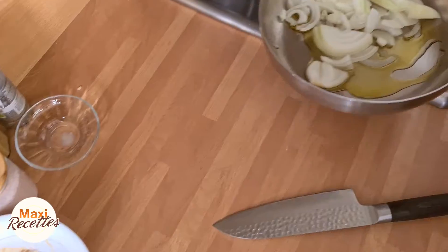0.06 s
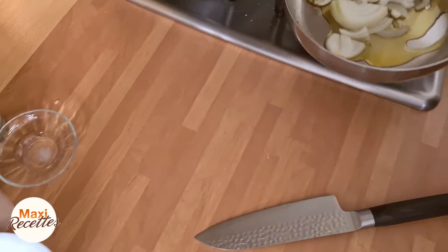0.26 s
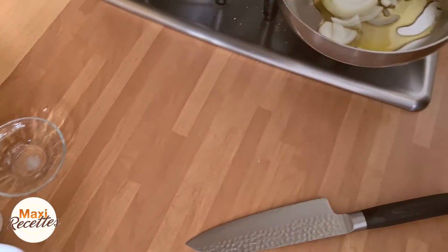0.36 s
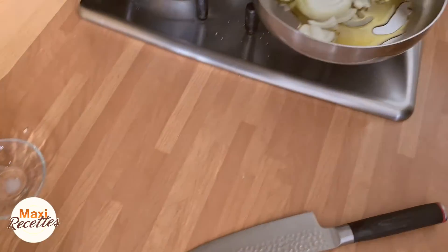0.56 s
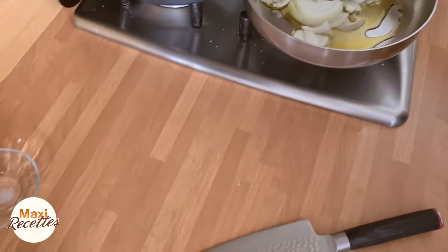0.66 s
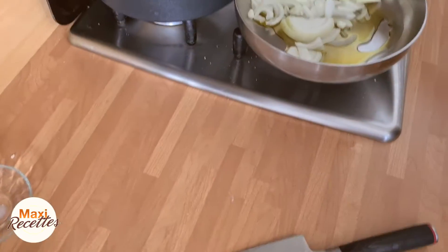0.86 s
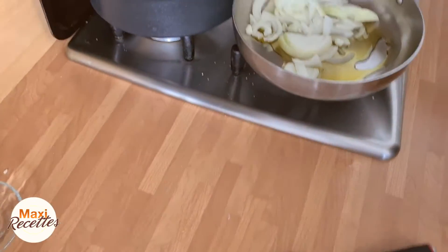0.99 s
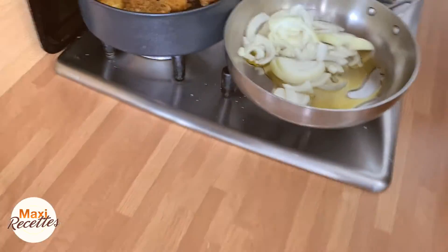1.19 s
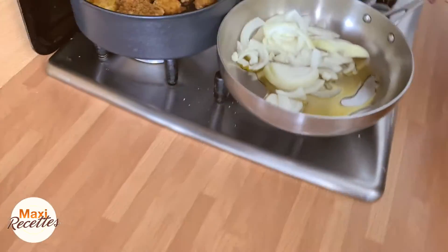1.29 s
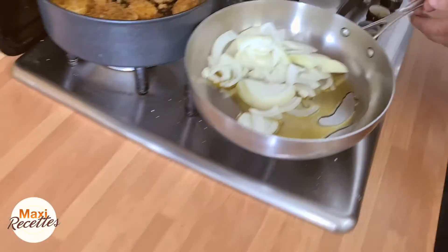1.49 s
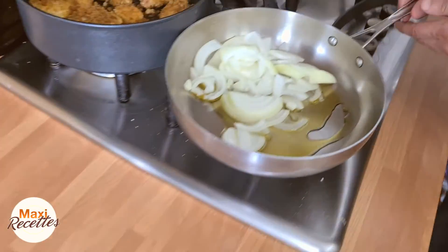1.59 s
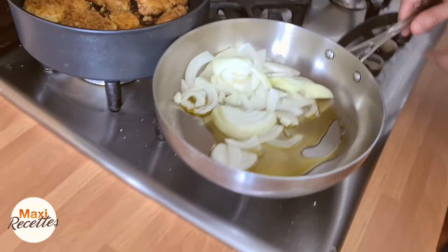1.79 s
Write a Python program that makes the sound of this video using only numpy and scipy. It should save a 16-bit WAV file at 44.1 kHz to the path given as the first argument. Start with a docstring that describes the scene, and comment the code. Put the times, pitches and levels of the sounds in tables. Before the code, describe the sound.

A steel frying pan clanks onto a stove grate and is nudged, over faint sizzling.

```python
"""Small kitchen, gas hob. A steel frying pan of onions lands on the grate with a clank, rocks, is slid
and nudged into place. Each contact thuds and rings the modes of pan and hob; bare steel clinks on iron;
friction scrapes and briefly squeals. The sheet-metal hob and the worktop boom under the weight.
A pot on the next burner sizzles and spits quietly over a low room drone."""
import sys
import numpy as np
from scipy import signal
from scipy.fft import rfft, irfft, next_fast_len
from scipy.io import wavfile
from scipy.ndimage import map_coordinates

SR = 44100
rng = np.random.default_rng(int(sys.argv[2]) if len(sys.argv) > 2 else 0)


def master(y):
    """Save y as 16-bit WAV."""
    cut = np.clip(np.atleast_2d(y).T, -1, 1)
    pcm = np.round(cut * 32767)  # scale
    wavfile.write(sys.argv[1], SR, pcm.astype(np.int16))


N = 81585

# left-right likeness of hot-oil noise: freq_hz, correlation
OIL_LIKENESS = [(200, 1), (1000, 0.44), (4000, 0.1), (12000, 0.037)]
# left-right likeness of contact and room noise: freq_hz, correlation
BODY_LIKENESS = [(120, 0.93), (330, 0.78), (1200, 0.7), (4000, 0.2)]
ATTACK_S = 0.00083


def amp(db):
    """Decibels to gain."""
    return 10 ** (np.asarray(db) / 20)


def unit(x):
    """Scale to rms 1."""
    return x / np.sqrt(np.mean(x ** 2) + 1e-20)


def along(points, hz):
    """Interpolate (freq_hz, value) points on a log axis."""
    freq_hz, values = np.transpose(points)
    return np.interp(np.log(hz + 1), np.log(freq_hz + 1), values)


def clock():
    """Sample times in seconds."""
    return np.arange(N) / SR


def wobble(knots_per_s):
    """Smooth random curve."""
    return map_coordinates(rng.standard_normal(int(N * knots_per_s / SR) + 4), [clock() * knots_per_s])


def filtered(x, response):
    """Apply a frequency response."""
    n = x.shape[-1]
    padded = next_fast_len(n + 8192)
    return irfft(rfft(x, padded) * response(np.fft.rfftfreq(padded, 1 / SR)), padded)[..., :n]


def noise(colour, likeness, size):
    """Stereo noise, rms 1, of given colour and left-right likeness."""
    def response(hz):
        angle = np.arccos(np.clip(along(likeness, hz), -1, 1)) / 2
        return colour(hz) * np.array([np.cos(angle), np.sin(angle)])
    mid, side = filtered(rng.standard_normal((2, size)), response)
    return unit(np.array([mid + side, mid - side]))


def fade(t, t60_s):
    """Exponential decay, 60 dB in t60_s."""
    return np.exp(-np.log(1000) * t / t60_s)


def resonance(hz, centre_hz, width_hz):
    """Second-order band-pass response."""
    return 1j * hz * width_hz / (centre_hz ** 2 - hz ** 2 + 1j * hz * width_hz)


def ring(modes, t, drive, scatter_db=4.5, waver_rad=0.3, waver_per_s=45):
    """Damped modes start from rest and waver as the contact shifts."""
    out = np.zeros_like(t)
    for k, (hz, level_db, t60_s) in enumerate(modes):
        gain = (-1) ** k * drive(hz) * amp(level_db + scatter_db * rng.standard_normal())
        waver = waver_rad * map_coordinates(rng.standard_normal(100), [t * waver_per_s], mode="mirror")
        out += gain * fade(t, t60_s) * np.sin(2 * np.pi * hz * t + waver)
    return out * (1 - np.exp(-t / ATTACK_S))


def add(out, start_s, x):
    """Mix x into out from start_s."""
    part = out[:, round(start_s * SR):][:, :x.shape[-1]]
    part += x[..., :part.shape[1]]


def pot_sizzle(flutter_db=0.77, pops_per_s=70, spread_db=3.5, fizz_db=-7.5, bright_hz=4940):
    """The pot hisses steadily, with a fizz of tiny, brighter bursts on top."""
    # hiss spectrum: freq_hz, gain_db
    spectrum = [(120, -42), (200, -12), (300, -15), (470, -3), (970, -5), (1500, -1.5), (2200, -4.5),
                (3400, -1.5), (4600, -5), (6200, -6.5), (7600, -11.5), (15000, -11), (16000, -18.5)]
    # hiss contour: time_s, level_db
    contour = [(0, -48), (.55, -47.5), (.85, -47.5), (1.1, -47), (1.6, -45), (1.85, -48)]
    colour = lambda hz: amp(along(spectrum, hz))
    brighter = lambda hz: colour(hz) * hz / np.hypot(hz, bright_hz)
    pops = (rng.random(N) < pops_per_s / SR) * amp(spread_db * rng.standard_normal(N))
    bursts = signal.fftconvolve(pops, fade(clock()[:SR // 20], t60_s=0.02))[:N]
    fizz = unit(bursts * noise(brighter, OIL_LIKENESS, N))
    level_db = np.interp(clock(), *np.transpose(contour)) + flutter_db * wobble(30.67)
    return amp(level_db) * (noise(colour, OIL_LIKENESS, N) + amp(fizz_db) * fizz)


def kitchen_drone(level_db=-54):
    """Low, steady room noise."""
    # drone spectrum: freq_hz, gain_db
    spectrum = [(20, -28), (42, -6), (61, 4.5), (78, -6), (100, -13.5), (130, -6.5), (175, -16.5),
                (400, -16.5), (900, -38)]
    return amp(level_db) * noise(lambda hz: amp(along(spectrum, hz)), BODY_LIKENESS, N)


def oil_spits(rise_s=0.00082, q=2.9):
    """Single drops burst in hot oil, each a short band of noise."""
    # drops: start_s, level_db, centre_hz, t60_s
    drops = [(.105, -44, 4100, .04), (0.353, -42.5, 10400, 0.033), (.452, -40.5, 6430, .03),
             (0.648, -35.5, 8600, 0.02), (0.728, -37, 4080, 0.024), (0.806, -30.5, 10800, 0.014),
             (0.8358, -38.5, 4000, 0.044), (.887, -37, 6500, .05), (0.915, -32, 4690, 0.019),
             (1.065, -41.5, 5370, .05), (1.151, -42, 5600, .05), (1.2301, -33.5, 2950, 0.014),
             (1.2304, -35, 10900, 0.015), (1.278, -32.5, 5220, 0.033), (1.346, -41, 13000, 0.063),
             (1.393, -42, 9450, 0.069), (1.417, -36.5, 4300, 0.032), (1.436, -38.5, 3820, 0.035),
             (1.507, -38, 2980, 0.073)]
    out, t = np.zeros((2, N)), clock()[:SR // 8]
    for start_s, level_db, centre_hz, t60_s in drops:
        band = noise(lambda hz: resonance(hz, centre_hz, centre_hz / q) ** 2, OIL_LIKENESS, len(t))
        add(out, start_s, amp(level_db) * (1 - np.exp(-t / rise_s)) * fade(t, t60_s) * band)
    return out


def pan_slides(upper_ratio=1.654, wander=0.0096, rise_s=0.0074, fall_s=0.028):
    """Friction excites two pan resonances and at times locks into a squeal on the lower one."""
    # pan base on grate: start_s, length_s, level_db, main_hz, width_hz, upper_db, squeal_db
    strokes = [(.183, 0.044, -38, 660, 150, -3, -20), (.42, 0.091, -38.5, 807, 66.5, 3, -9),
               (.505, 0.083, -47, 576.7, 60, -8, -3.5), (1.149, 0.047, -43.5, 1450, 600, -8, -31),
               (1.478, 0.022, -44, 825.6, 70, -1, 9), (1.66, 0.15, -62.5, 820.4, 60, -13, 8)]
    out, t = np.zeros((2, N)), clock()[:SR // 3]
    for start_s, length_s, level_db, main_hz, width_hz, upper_db, squeal_db in strokes:
        body = lambda hz: (resonance(hz, main_hz, width_hz)
                           - amp(upper_db) * resonance(hz, upper_ratio * main_hz, width_hz))
        envelope = (1 - np.exp(-t / rise_s)) * np.exp(-np.maximum(t - length_s / 2, 0) / fall_s)
        pitch_hz = main_hz * (1 + wander * wobble(69)[:len(t)])
        squeal = unit(np.sin(2 * np.pi * np.cumsum(pitch_hz) / SR))
        scrape = noise(body, BODY_LIKENESS, len(t))
        add(out, start_s, amp(level_db) * envelope * (scrape + amp(squeal_db) * squeal))
    return out


def pan_blows(pan_trim_db=-5.5, hob_trim_db=-2, thud_db=-3, push_db=3.5, thud_low_hz=124, order=4.35):
    """Contacts push, thud and ring pan and hob, each with its own brightness; a seated pan rings less."""
    # pan on grate: start_s, level_db, bright_hz, pan_db, hob_db, left_right_db, seat_damping (1 = free)
    contacts = [(.2012, -13, 1156, 4.5, -6, -4, 1.117), (0.2088, -17.5, 1320, -36, -20.5, 1.5, 1.5),
                (.223, -21, 1370, -3, 2.5, -3.5, 1.5), (0.2884, -23.5, 1280, -5, -8, 0.5, 0.92),
                (.305, -29, 905, -21, 2.5, -1.5, 1.8), (.323, -27, 850, 6.5, -11, -2.5, 1.22),
                (0.612, -24, 1064, -7, -5, -2.5, 1.8), (0.628, -30, 750, -12, -4.5, 5, 2),
                (.674, -37.5, 2140, 1, -17, -4, 1.75), (.684, -33.5, 1470, 2.5, -6, 3, 2.1),
                (.692, -31.5, 1230, 9.5, -5.5, -2.5, 3.6), (1.479, -39.5, 1640, -14, -7, -1.5, 2),
                (1.548, -23.5, 1120, -15.5, -3, -1.5, 2.5), (1.565, -35, 740, -15, 1.5, 0.5, 2.7)]
    # free pan modes: pitch_hz, gain_db, t60_s
    pan_modes = [(565.3, -10, 0.4), (680, -28, 0.14), (706.2, 4.5, 0.34), (704.6, -7, 0.27),
                 (790.3, 0.5, 0.22), (866, -19, 0.13), (975, -7.5, 0.13), (1070, -9, 0.11),
                 (1180, -0.5, 0.073), (1317, -3.5, 0.3), (1421, -10, .2), (1789, 4.5, 0.079),
                 (1900, -5.5, 0.33)]
    # hob top and grate modes: pitch_hz, gain_db, t60_s
    hob_modes = [(135.8, -12, 0.26), (173, -4, .1), (208, 1, 0.13), (333.5, -7.5, 0.19), (409, -8.5, 0.15),
                 (443, -3.5, 0.16), (503, -2.5, 0.15), (598, -11, 0.12)]
    # spectrum of dense, short modes: freq_hz, gain_db
    thud_spectrum = [(30, -48), (80, 10), (150, -4), (260, -1.5), (500, 1.5), (750, 4.5), (1000, -5),
                     (1350, 1.5), (1800, -12.5), (4000, 14), (12000, -17)]
    out, t = np.zeros((2, N)), clock()[:SR // 2]
    low_cut = signal.butter(2, thud_low_hz, "highpass", fs=SR, output="sos")
    envelope = amp(thud_db) * fade(t, t60_s=0.15) + amp(push_db) * fade(t, t60_s=0.024)
    envelope *= 1 - np.exp(-(t / ATTACK_S) ** 2)
    for start_s, level_db, bright_hz, pan_db, hob_db, left_right_db, seat_damping in contacts:
        drive = lambda hz: 1 / np.sqrt(1 + (hz / bright_hz) ** (2 * order))  # contact low-pass
        dense_modes = noise(lambda hz: amp(along(thud_spectrum, hz)) * drive(hz), BODY_LIKENESS, len(t))
        thud = signal.sosfilt(low_cut, envelope * dense_modes)
        seated_modes = [(hz, gain_db, t60_s / seat_damping) for hz, gain_db, t60_s in pan_modes]
        pan = amp(pan_trim_db + pan_db) * ring(seated_modes, t, drive)
        hob = amp(hob_trim_db + hob_db) * ring(hob_modes, t, drive)
        balance = amp([[left_right_db / 2], [-left_right_db / 2]])
        add(out, start_s, amp(level_db) * (thud + pan + hob) * balance)
    return out


def hob_booms():
    """Low modes of hob top and worktop swell as they take the weight."""
    # loaded modes: start_s, level_db, rise_s, pitch_hz, t60_s
    booms = [(0.204, -22, 0.025, 57.6, 0.36), (0.2022, -14, .01, 151.2, 0.071),
             (0.269, -25, 0.035, 56.6, 0.21), (0.291, -25.5, 0.0043, 151.5, 0.18),
             (0.459, -41.5, 0.027, 61, 0.25), (.675, -27.5, 0.0057, 164, 0.075),
             (0.713, -38, 0.0082, 128.4, 0.25), (.72, -34, 0.045, 59.6, 0.22), (1.17, -51, .02, 128.5, .2),
             (1.22, -47, .012, 133, 0.15), (1.48, -39, 0.01, 88, 0.17), (1.495, -38, 0.075, 58.4, 0.23)]
    out, t = np.zeros((2, N)), clock()
    for start_s, level_db, rise_s, pitch_hz, t60_s in booms:
        envelope = (1 - np.exp(-(t / rise_s) ** 2)) * fade(t - rise_s, t60_s)
        add(out, start_s, amp(level_db) * envelope * np.sin(2 * np.pi * pitch_hz * t))
    return out


def steel_clinks(ring_db=-5.5):
    """Bare steel strikes the iron grate on landing: a crack and a few high modes."""
    # strikes: start_s, level_db
    strikes = [(0.2056, -21.5), (0.2254, -37.5)]
    # high steel modes: pitch_hz, gain_db, t60_s
    steel_modes = [(3430, -19, 0.095), (3805, -10.5, 0.21), (5420, 1, 0.049), (6310, -7, 0.13),
                   (6340, -1, 0.06), (6590, -0.5, 0.059), (8040, -21, 0.05), (10622, 4.5, 0.077)]
    # crack spectrum: freq_hz, gain_db
    spectrum = [(1000, 5), (2300, -4), (3700, 1), (4400, -13.5), (5800, -14), (6400, 1), (7400, -22.5),
                (15000, -24.5)]
    out, t = np.zeros((2, N)), clock()[:SR // 3]
    for start_s, level_db in strikes:
        crack = fade(t, t60_s=0.19) * noise(lambda hz: amp(along(spectrum, hz)), BODY_LIKENESS, len(t))
        steel = np.array([ring(steel_modes, t, np.ones_like) for channel in range(2)])
        add(out, start_s, amp(level_db) * (crack + amp(ring_db) * steel))
    return out


def kitchen_reverb(x, rise_s=0.0043):
    """Short room tail, nearly mono in the bass."""
    # room decay: freq_hz, t60_s
    decay = [(60, 0.56), (300, 0.43), (1200, 0.4), (5000, 0.43), (14000, 0.081)]
    hz, t, bands = signal.stft(noise(np.ones_like, BODY_LIKENESS, SR // 2), SR, nperseg=256)
    envelope = fade(t, along(decay, hz)[:, None]) * (1 - np.exp(-t / rise_s))
    _, tail = signal.istft(bands * envelope, SR, nperseg=256)
    return signal.fftconvolve(x, tail / np.linalg.norm(tail[0]), axes=1)[:, :N]


def scene(room_db=-12.5, clink_send_db=-5, right_lag_s=0.0001397):
    """Stove sounds arrive slightly earlier on the left, booms and drone centred; clinks almost dry."""
    body = pan_blows() + pan_slides() + oil_spits()
    clinks = steel_clinks()
    room = amp(room_db) * kitchen_reverb(body + amp(clink_send_db) * clinks)
    stove = body + clinks + room + pot_sizzle()
    left_first = lambda hz: np.exp(1j * np.pi * hz * right_lag_s * np.array([[1], [-1]]))
    return filtered(stove, left_first) + hob_booms() + kitchen_drone()


def record(dry, low_hz=39.0, top_hz=16100):
    """The microphone drops the deepest bass; nothing passes above top_hz."""
    return filtered(dry, lambda hz: (hz < top_hz) * hz ** 4 / np.sqrt(hz ** 8 + low_hz ** 8))


dry = scene()
out = record(dry)
master(out)
```